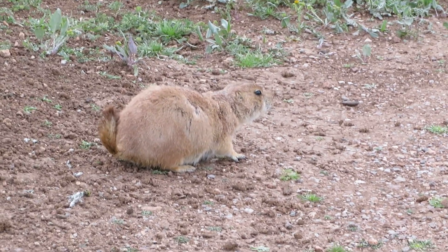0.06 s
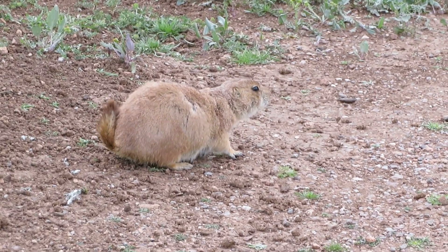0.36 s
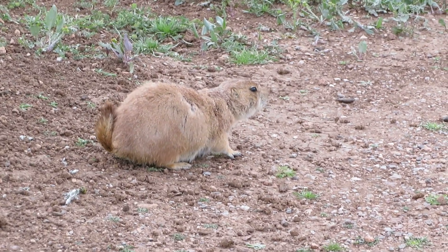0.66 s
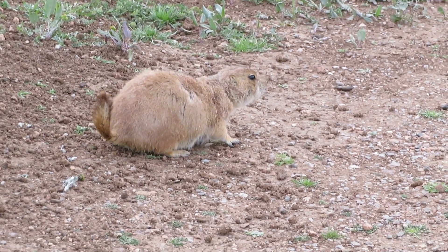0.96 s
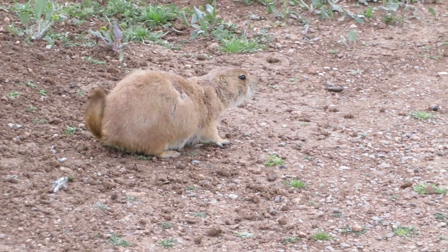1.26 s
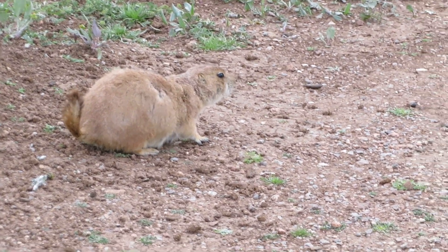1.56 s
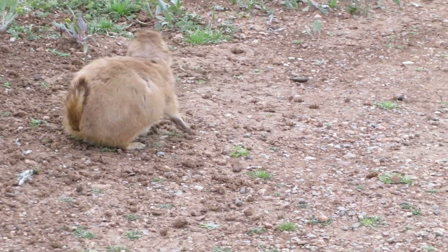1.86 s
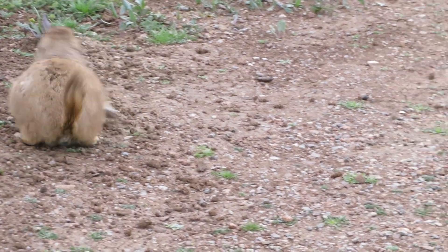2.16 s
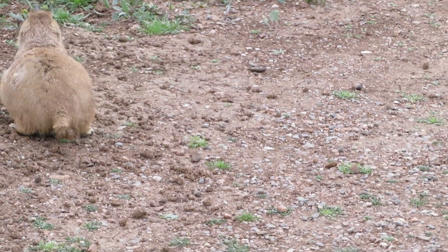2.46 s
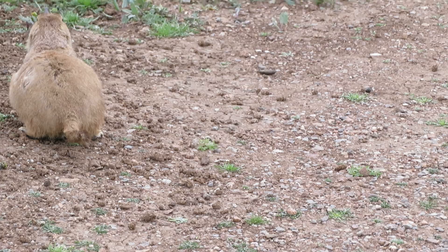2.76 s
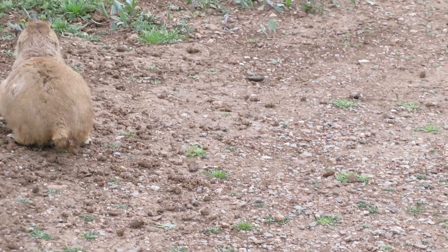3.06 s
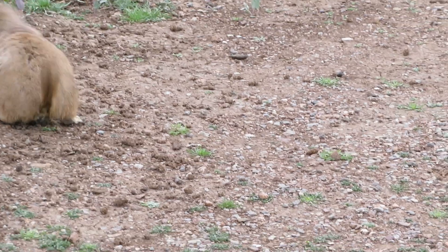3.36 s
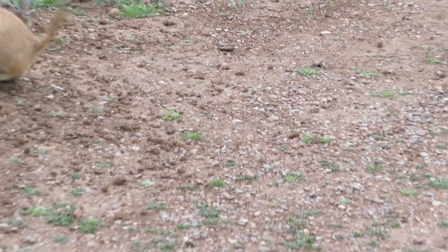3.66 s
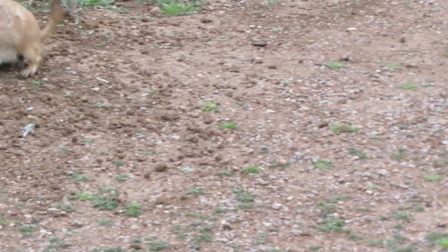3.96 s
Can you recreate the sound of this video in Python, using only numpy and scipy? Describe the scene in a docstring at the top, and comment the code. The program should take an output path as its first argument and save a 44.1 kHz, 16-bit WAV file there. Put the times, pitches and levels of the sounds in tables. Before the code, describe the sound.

A prairie dog barks four times, short, high and raspy, each a little softer, with faint falling squeaks between. Then its feet scuff faintly on grit. Gusts of wind rumble on the microphone throughout, over a quiet outdoor hiss.

```python
"""Open ground in gusty wind: a prairie dog barks four times, with faint falling squeaks between, then
shuffles off over the grit. Each bark is a pitch arch, shaped by throat and mouth, that starts clean
and turns rough. An insect briefly ticks about twenty times a second. Gusts buffet the microphones
over a quiet outdoor hiss, and a thin distant buzz comes in near the end."""
import sys
import numpy as np
from scipy import signal
from scipy.fft import rfft, irfft
from scipy.io import wavfile
from scipy.ndimage import uniform_filter1d

SR = 44100
rng = np.random.default_rng(int(sys.argv[2]) if len(sys.argv) > 2 else 0)


def transcribe(signal):
    """Save signal, clipped to [-1, 1], as a 16-bit WAV file at the path in sys.argv[1]."""
    frames = np.atleast_2d(signal).T
    limited = np.clip(frames, -1, 1)
    pcm = np.round(limited * 32767).astype(np.int16)
    wavfile.write(sys.argv[1], SR, pcm)


N = 176400
TIME = np.arange(N) / SR
PREROLL = SR // 4  # samples ahead of the voice track: the first bark is under way at time zero


def amp(db):
    """Decibels to gain."""
    return 10 ** (np.asarray(db) / 20)


def unit(x):
    """Scales to rms 1."""
    return x / np.sqrt(np.mean(abs(x) ** 2) + 1e-20)


def at_hz(points, hz):
    """Reads a table on a log-frequency axis."""
    f, value = np.transpose(points)
    return np.interp(np.log(hz + 1), np.log(f + 1), value)


def fader_db(points):
    """Draws a level curve across the whole scene."""
    return np.interp(TIME, *np.transpose(points))


def ramp(u):
    """Smooth step from 0 to 1."""
    return np.sin(np.pi / 2 * np.clip(u, 0, 1)) ** 2


def add(mix, start_s, sound):
    """Mixes a sound in, trimming what falls outside the track."""
    at = round(start_s * SR)
    sound = sound[max(-at, 0):]
    part = mix[max(at, 0):][:len(sound)]
    part += sound[:len(part)]


def eq(x, gain):
    """Filters by a gain that is a function of frequency."""
    return irfft(rfft(x) * gain(np.fft.rfftfreq(x.shape[-1], 1 / SR)), x.shape[-1])


def bell(hz, octaves):
    """Bell-shaped gain around hz."""
    return lambda f: np.exp(-.5 * (np.log2((f + 1) / hz) / octaves) ** 2)


def noise(points, size):
    """Noise with a tabled spectrum, rms 1."""
    return unit(eq(rng.standard_normal(size), lambda f: amp(at_hz(points, f))))


def band_noise(hz, octaves, size):
    """A band of noise around hz, rms 1."""
    return unit(eq(rng.standard_normal(size), bell(hz, octaves)))


def wobble(hz, size):
    """Random motion up to about hz, rms 1."""
    return unit(eq(rng.standard_normal(size), lambda f: np.exp(-.5 * (f / hz) ** 2)))


def phase(hz):
    """Running phase of a pitch curve."""
    return 2 * np.pi * np.cumsum(hz) / SR


def blip(t, rise_s):
    """Envelope that peaks at 1 after rise_s and dies away."""
    return t / rise_s * np.exp(1 - t / rise_s)


# Resonances of throat and mouth: freq_hz, gain_db
THROAT_EQ = [(1150, -24), (1350, -7), (1570, -1.5), (1950, -8), (2300, 3), (2750, -1), (3200, -2),
             (3600, -3), (4050, -4), (4800, -25.5), (5500, -20.5), (6300, -9), (7000, -15), (8000, -38),
             (9800, -20.5), (11000, -46), (15000, -52)]
# Colour of the hoarse noise in a bark: freq_hz, gain_db
HOARSE_EQ = [(400, -16), (1200, -16), (1700, 9), (2300, -18.5), (3300, 10), (4200, -8), (5500, -12),
             (6600, -9), (8000, -26), (10000, -18), (11500, -35), (15000, -43)]


def bark(length_s, level_db, top_hz, clean_share, roughness, treble_db):
    """A harmonic arch through the throat: it starts clean, turns rough and breaks up as it ends."""
    climb_s, drop_s, sag_hz_per_s = 0.01814, 0.0189, 1850
    attack_s, swell_s, release_s, rattle_s = 0.0013, 0.019, 0.014, 0.0055
    flutter_hz, rasp_hz = 311.1, 272
    size = 4096
    t = np.arange(size) / SR
    climb = 0.88 + 0.12 * ramp(t / climb_s)
    drop = 1 - 0.13 * np.clip(1 - (length_s - t) / drop_s, 0, 1) ** 2
    hz = top_hz * climb * drop - sag_hz_per_s * np.maximum(t - climb_s, 0)
    rough = roughness * ramp((t - clean_share * length_s) / 0.0018)
    effort_db = -11 * np.clip(1 - t / swell_s, 0, 1)
    mouth_open = ramp((length_s - t) / release_s)
    cycle = phase(hz * (1 + 0.014 * rough * wobble(220, size)))
    flutter = phase(flutter_hz * (1 + 0.1 * wobble(59, size)))
    voice = np.zeros(size)
    for k in range(1, 10):
        tilt_db = (treble_db - 9 * (1 - mouth_open)) * np.log2(max(k / 2, 1))  # closing dulls it
        tilt_db += 0.38 * effort_db * np.log2(max(k / 3, 1))  # effort brightens it
        depth = rough * min(k / 2, 1)
        rasp = 0.33 * depth * (wobble(rasp_hz, size) + 1j * wobble(rasp_hz, size))
        harmonic = ((1 + rasp) * np.exp(1j * k * cycle)).real
        voice += amp(at_hz(THROAT_EQ, k * hz) + tilt_db) * harmonic
        # A second vibration puts a sideband above and below each harmonic.
        for offset, share in ((0.93, 0.74), (-0.62, 0.11)):
            throat_gain = amp(at_hz(THROAT_EQ, k * hz + offset * flutter_hz) + tilt_db)
            voice += share * depth * throat_gain * np.cos(k * cycle + offset * flutter)
    voice *= amp(-1 * rough)  # the tone gives up strength to the roughness
    voice += amp(-9) * rough * noise(HOARSE_EQ, size)
    voice += amp(-20.5) * noise(HOARSE_EQ, size)
    voice *= ramp(t / attack_s) * mouth_open
    break_up = np.exp(-.5 * ((t - length_s + rattle_s) / rattle_s) ** 2)
    rattle = amp(-14) * break_up * band_noise(hz=2940, octaves=0.17, size=size)
    return amp(level_db + effort_db) * (voice + rattle)


# Bark cues: start_s, length_s, level_db, top_pitch_hz, clean_share, roughness, treble_db_per_octave
BARK_CUES = [(-.047, 0.062, -21, 1627, 0.1, 0.48, -8.5), (0.355, .060, -22.5, 1637, 0.26, 1.03, -1.5),
             (0.797, .057, -24, 1614, 0.19, 1.03, -5), (1.264, 0.0467, -27.5, 1522, 0.56, 0.66, -6.5)]


def barks():
    """The prairie dog's four calls, easing off in level."""
    out = np.zeros(PREROLL + N)
    for start_s, *settings in BARK_CUES:
        add(out, start_s + PREROLL / SR, bark(*settings))
    return out


# Colour of the open-air hiss: freq_hz, gain_db
AIR_EQ = [(180, -12), (300, -0.5), (397, -2.5), (849, -8), (968, -4.5), (1300, -8.5), (2250, -10.5),
          (5050, -16.5), (13400, -29.5), (15500, -42)]
# How alike the hiss is left and right: freq_hz, correlation
AIR_LIKENESS = [(300, 0.72), (1000, 0.063), (3000, 0.11), (15000, 0.104)]
# Slow drift of the hiss: time_s, level_db
AIR_FADER = [(0, -52.5), (1.5, -53), (2.15, -52.5), (2.9, -53.5), (3.5, -52), (3.75, -55), (4, -53.5)]


def air():
    """Soft outdoor hiss, centred in the lows and wide in the highs."""
    left, spread = noise(AIR_EQ, N), noise(AIR_EQ, N)
    right = eq(left, lambda f: at_hz(AIR_LIKENESS, f))
    right += eq(spread, lambda f: np.sqrt(1 - at_hz(AIR_LIKENESS, f) ** 2))
    return np.array([left, right]) * amp(fader_db(AIR_FADER))


# Rise and fall of the gusts: time_s, strength_db
GUST_FADER = [(0.0, -42), (0.08, -53), (0.13, -29.5), (0.19, -34), (0.21, -54), (0.3, -49.5), (0.335, -21),
              (0.39, -23.5), (0.42, -20), (0.51, -33.5), (0.6, -36.5), (0.7, -67), (0.78, -36),
              (0.92, -50.5), (0.97, -38), (1.06, -85), (1.15, -82), (1.19, -33.5), (1.26, -41.5),
              (1.32, -32.5), (1.38, -46), (1.43, -35), (1.48, -57), (1.6, -58), (1.69, -24.5),
              (1.82, -37.5), (1.85, -26.5), (1.88, -31), (1.95, -25.5), (1.97, -40), (2.0, -25.5),
              (2.04, -37.5), (2.14, -28), (2.21, -49), (2.25, -26), (2.35, -47), (2.38, -32.5), (2.45, -29),
              (2.47, -45), (2.57, -52), (2.73, -60), (2.76, -33), (2.8, -56), (2.83, -29), (2.88, -56),
              (3.09, -59.5), (3.15, -30.5), (3.24, -59), (3.36, -59), (3.41, -33), (3.45, -53), (3.53, -30),
              (3.59, -38.5), (3.64, -24), (3.655, -33), (3.71, -16), (3.75, -27), (3.79, -22), (3.83, -42),
              (3.89, -47), (3.98, -29), (4.0, -58)]
# Colour of light air and of a hard gust: freq_hz, gain_db
BREEZE_EQ = [(15, 4.5), (35, -13), (65, 2.5), (115, 2.5), (170, -7), (250, -16.5), (350, -27.5), (500, -41),
             (800, -92), (2000, -86)]
GUST_EQ = [(15, -31), (35, -7), (65, -7.5), (125, 4), (210, 2), (300, -9.5), (450, -22), (600, -45.5),
           (900, -43), (2000, -95)]
# Low shelf on the deepest rumble: time_s, gain_db
BASS_FADER = [(0, 5), (.4, 1), (1.3, 0), (2.0, -3), (2.8, -3.5), (3.4, -4), (3.7, -4.5), (4, -2.5)]


def eddies():
    """Low turbulence that reaches higher in frequency as the gust grows."""
    breeze_db, gust_db, shelf_hz = -28.5, -18, 104
    strength_db = fader_db(GUST_FADER)
    hard = ramp((strength_db - breeze_db) / (gust_db - breeze_db))
    flow = np.sqrt(1 - hard) * noise(BREEZE_EQ, N) + np.sqrt(hard) * noise(GUST_EQ, N)
    bass = eq(flow, lambda f: 1 / (1 + (f / shelf_hz) ** 6))
    flow += bass * (amp(fader_db(BASS_FADER)) - 1)
    # Gentle compression steadies the random swells.
    power = uniform_filter1d(abs(signal.hilbert(flow)) ** 2, size=700)
    swell = uniform_filter1d(np.sqrt(abs(power) + 1e-9), size=400)
    return amp(strength_db + 1.5) * unit(flow / swell ** 0.14)


# Rumble of light air that never stops: freq_hz, gain_db
RUMBLE_EQ = [(15, -22), (35, 1), (60, 2), (120, -9), (200, -12), (400, -63)]
# Single hard buffets: peak_s, level_db, pitch_hz, left_minus_right_db
BUFFET_CUES = [(0.4188, -7, 150, -1.5), (.438, -23.5, 300, 10), (1.9411, -13, 137, 3),
               (3.667, -14.5, 187, 2), (3.697, -6, 235, 2), (3.7049, -18, 360, -13), (3.7116, -9, 185, -5),
               (3.7269, -13, 196, -1), (3.764, -16, 230, 2), (3.968, -21.5, 160, 1)]


def wind():
    """Turbulence and hard thumps; the smaller an eddy, the more it differs between the microphones."""
    wide_above_hz, ring_cycles = 440, 1.56
    mid = eddies() + amp(-49) * noise(RUMBLE_EQ, N)
    side = eq(eddies(), lambda f: np.minimum(f / wide_above_hz, 1) ** 1.74)
    out = np.array([mid + side, mid - side])
    t = np.arange(-1024, 1024) / SR
    for peak_s, level_db, hz, pan_db in BUFFET_CUES:
        thump = -np.cos(2 * np.pi * hz * t) * np.exp(-(np.pi * hz * t / ring_cycles) ** 2)
        add(out[0], peak_s + t[0], amp(level_db + pan_db / 2) * thump)
        add(out[1], peak_s + t[0], amp(level_db - pan_db / 2) * thump)
    return out


# Mouth pops: start_s, level_db, pitch_hz
POP_CUES = [(.018, -42.5, 800), (.861, -43, 800), (1.034, -45, 840), (1.319, -44, 784)]


def mouth_pops():
    """Small pops of the mouth, each a quickly damped tone."""
    out, t = np.zeros(PREROLL + N), np.arange(2048) / SR
    for start_s, level_db, hz in POP_CUES:
        pop = blip(t, rise_s=0.0028) * np.sin(2 * np.pi * hz * t)
        add(out, start_s + PREROLL / SR, amp(level_db) * pop)
    return out


# Squeaks after the barks: start_s, length_s, level_db, first_pitch_hz, last_pitch_hz, waver_share
SQUEAK_CUES = [(0.124, 0.073, -36.5, 1028, 736, 0.061), (0.176, 0.094, -40.5, 943, 543, 0.051),
               (0.503, 0.021, -35.5, 925, 840, 0.043), (0.517, 0.065, -38.5, 895, 549, 0.035),
               (1.019, 0.024, -39.5, 1880, 1570, 0.092), (1.037, 0.0477, -45, 2155, 1820, 0.072),
               (1.09, 0.043, -45, 963, 624, 0.12), (1.377, 0.048, -37.5, 918, 575, 0.053)]


def squeaks():
    """Thin wavering tones of the voice that slide down and fade."""
    attack_s, release_s, fade_db, harmonics_db = 0.012, 0.0025, -11.5, (-1.5, -17, -22)
    out, t = np.zeros(PREROLL + N), np.arange(4096) / SR
    for start_s, length_s, level_db, first_hz, last_hz, waver in SQUEAK_CUES:
        progress = np.minimum(t / length_s, 1)
        slide_hz = first_hz * (last_hz / first_hz) ** progress
        cycle = phase(slide_hz * (1 + waver * wobble(190, len(t))))
        tone = sum(amp(db) * np.sin(k * cycle) for k, db in enumerate(harmonics_db, 1))
        rasp = 1 + 0.2 * wobble(170, len(t))
        gate = ramp(t / attack_s) * ramp((length_s - t) / release_s)
        envelope = amp(level_db + fade_db * progress ** 2) * gate
        add(out, start_s + PREROLL / SR, envelope * tone * rasp)
    return out


# Insect ticks: start_s, level_db, pitch_hz
TICK_CUES = [(0.505, -51, 6450), (0.557, -52.5, 5900), (.607, -51, 5800), (0.656, -50, 6050),
             (0.707, -52, 5760), (0.757, -52, 5900), (.857, -52, 6200), (0.905, -50.5, 5970),
             (0.959, -51.5, 5820), (1.010, -53.5, 6240), (1.063, -52, 6100)]
# Colour of a tick's rasp: freq_hz, gain_db
TICK_EQ = [(4500, -24), (6500, 4.5), (8000, 4), (10000, 2), (13000, -7), (16000, -16)]


def insect():
    """Each tick is a bright rasp that ends in a short sagging note; the rasp softens along the run."""
    soften_db_per_s, sag_hz_per_s, note_s, note_delay_s = 15, 10000, 0.015, 0.00075
    out, t = np.zeros(N), np.arange(1024) / SR
    note_envelope = np.sin(np.pi * np.minimum(t / note_s, 1)) ** 2
    for start_s, level_db, pitch_hz in TICK_CUES:
        rasp_db = level_db - soften_db_per_s * (start_s - TICK_CUES[0][0])
        add(out, start_s, amp(rasp_db) * blip(t, rise_s=0.0027) * noise(TICK_EQ, len(t)))
        hz = (pitch_hz - sag_hz_per_s * t) * (1 + 0.048 * wobble(500, len(t)))
        add(out, start_s + note_delay_s, amp(level_db + 1) * note_envelope * np.sin(phase(hz)))
    return out


# Clicks and scuffs of grit: start_s, level_db, rise_s, centre_hz, width_octaves
SCUFF_CUES = [(1.778, -43, 0.0022, 1160, 0.27), (1.9195, -40, 0.00065, 12000, 1.0),
              (2.548, -56, 0.0018, 4500, 0.74), (3.069, -44, 0.0014, 4370, 0.082),
              (3.4425, -48.5, 0.0032, 4300, 1.15), (3.441, -41, 0.0031, 3330, 0.17),
              (3.422, -49, 0.0092, 1670, 1.03)]


def scuffs():
    """Grit underfoot: short dry bursts, each with its own colour."""
    out, t = np.zeros(N), np.arange(4096) / SR
    for start_s, level_db, rise_s, hz, octaves in SCUFF_CUES:
        add(out, start_s, amp(level_db) * blip(t, rise_s) * band_noise(hz, octaves, len(t)))
    return out


# Shape of the shuffle: time_s, level_db
RUSTLE_FADER = [(1.9, -68), (1.943, -60.5), (1.97, -83), (2.02, -75), (2.04, -64), (2.06, -72),
                (2.078, -54), (2.088, -58), (2.1, -51), (2.117, -54), (2.128, -76)]
# Colour of the grains: freq_hz, gain_db
RUSTLE_EQ = [(1500, -7), (3000, 2), (6000, -10), (10000, -3), (14000, 1), (16000, -6)]


def rustle(grains_per_s=550):
    """The animal's feet stir many tiny grains as it turns."""
    grains = rng.standard_normal(N) * (rng.random(N) < grains_per_s / SR)
    grit = unit(eq(grains, lambda f: amp(at_hz(RUSTLE_EQ, f))))
    gate = (TIME > RUSTLE_FADER[0][0]) & (TIME < RUSTLE_FADER[-1][0])
    return amp(fader_db(RUSTLE_FADER)) * gate * grit


# Swell of the distant buzz: time_s, level_db
BUZZ_FADER = [(3.35, -78), (3.43, -62.5), (3.6, -57.5), (3.88, -62), (3.94, -74)]


def distant_buzz():
    """A thin, narrow band of noise, wide in stereo."""
    gate = TIME > BUZZ_FADER[0][0]
    return amp(fader_db(BUZZ_FADER)) * gate * band_noise(hz=3510, octaves=0.1, size=(2, N))


def open_ground(x, left_lag_s):
    """Direct sound at two microphones, weak scatter from ground and plants, and one far echo."""
    echoes_per_s, t60_s, far_echo_s = 2000, 0.21, 0.043
    t = np.arange(16384) / SR
    taps = rng.standard_normal((2, len(t))) * (rng.random((2, len(t))) < echoes_per_s / SR)
    taps *= amp(-60 * t / t60_s) * ramp(t / 0.013)
    taps *= amp(-17) / np.linalg.norm(taps, axis=1, keepdims=True)
    taps[:, round(far_echo_s * SR)] += amp(-29.5)
    echoes = signal.fftconvolve(x[None], eq(taps, bell(hz=3130, octaves=1)), axes=1)
    left = eq(x, lambda f: np.exp(-2j * np.pi * f * left_lag_s))
    return np.array([left, x]) + echoes[:, :len(x)]


def scene():
    """The animal ahead, with insect, grit, wind and air around it."""
    voice = open_ground(barks() + squeaks() + mouth_pops(), left_lag_s=6e-6)[:, PREROLL:]
    small_sounds = open_ground(scuffs() + rustle() + insect(), left_lag_s=17e-6)
    return voice + small_sounds + wind() + air() + distant_buzz()


def record(dry):
    """A 1 ms fade-in and a steep high cut at 15.9 kHz."""
    high_cut = signal.firwin(255, 15900, window=("kaiser", 9), fs=SR)
    return signal.oaconvolve(dry * ramp(TIME / .001), high_cut[None], "same")


dry = scene()
out = record(dry)
transcribe(out)
```